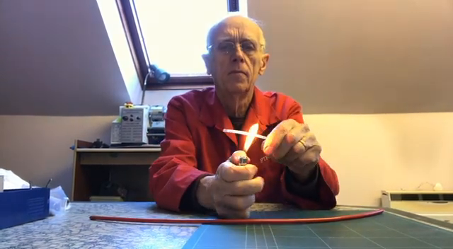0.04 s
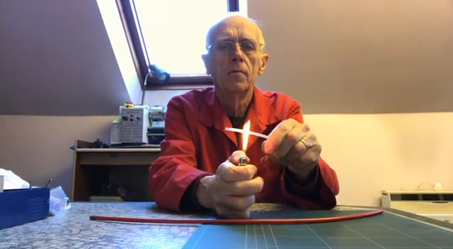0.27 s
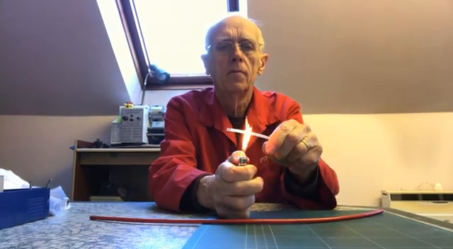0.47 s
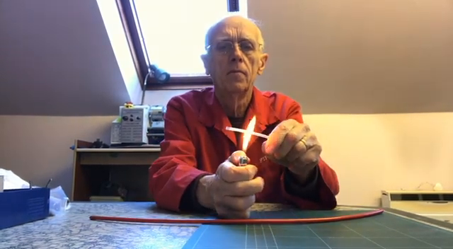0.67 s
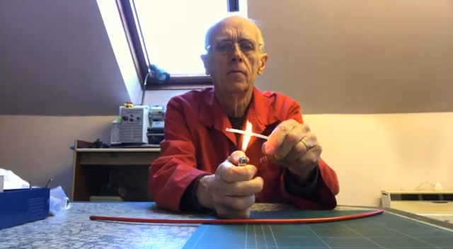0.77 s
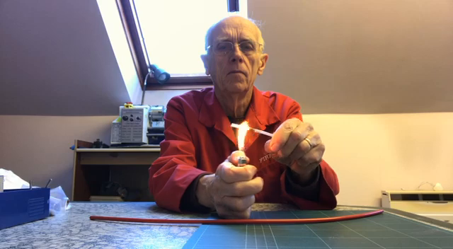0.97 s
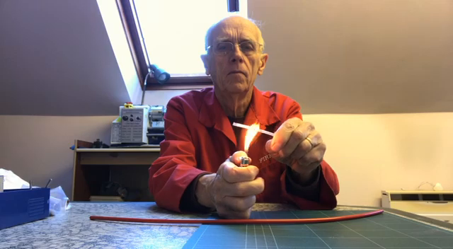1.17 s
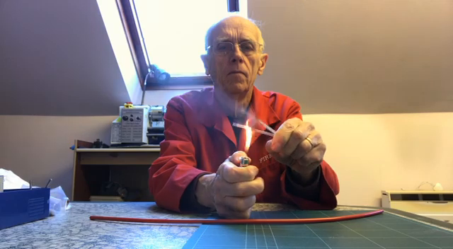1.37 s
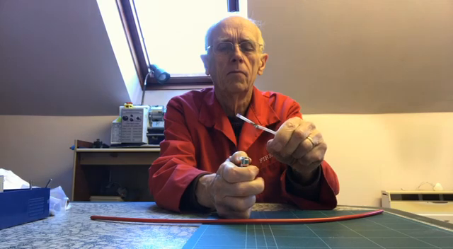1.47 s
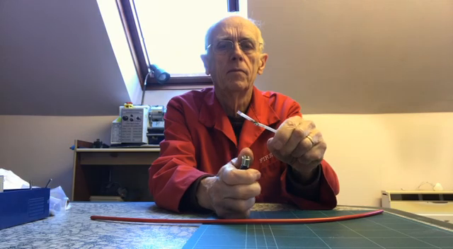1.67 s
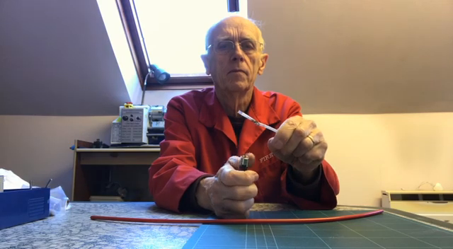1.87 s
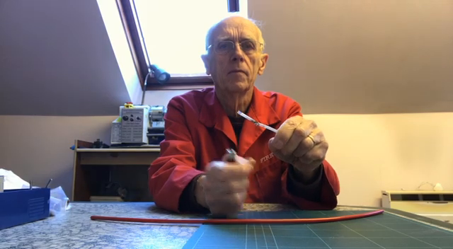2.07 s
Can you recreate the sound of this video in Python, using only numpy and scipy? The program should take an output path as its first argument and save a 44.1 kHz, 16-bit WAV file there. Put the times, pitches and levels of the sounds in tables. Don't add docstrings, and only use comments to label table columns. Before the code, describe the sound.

Quiet small room with a clock ticking about three times a second, low hum and faint hiss; then a sudden loud, bright pop of a plastic tube overloads the nearby microphone and dies quickly, leaving soft thumps and ticks.

```python
import sys
import numpy as np
from scipy import signal
from scipy.io import wavfile
from scipy.ndimage import map_coordinates

SR = 44100
rng = np.random.default_rng(int(sys.argv[2]) if len(sys.argv) > 2 else 0)


def output_pcm(signal):
    pcm = np.clip(np.atleast_2d(signal).T, -1, 1) * 32767
    wavfile.write(sys.argv[1], SR, np.round(pcm).astype(np.int16))


def gain_from_db(level_db):
    decades = np.asarray(level_db, float) / 20
    return 10 ** decades


N = 94109
T = np.arange(N) / SR

# (frequency [Hz], level [dB per Hz])
POP_COLOUR = [(40, -30.5), (200, -32), (600, -11.5), (2800, -9), (6500, -3.5), (8800, -10.5), (10500, -18),
              (15600, -20.5)]
# (frequency [Hz], t60 [s])
ROOM_DECAY = [(60, .1), (300, 0.25), (1000, .165), (3000, .155), (6500, 0.16), (12000, .15)]
# (time [s], share of the burst)
WALL_SLAPS = [
    (1.439, 3.0),
]
# (time [s], level [dB])
TEAR_RASP = [
    (1.3605, -69.5),
    (1.3625, -16.5),
    (1.369, -19),
    (1.375, -9),
    (1.380, -18),
    (1.383, -10.5),
    (1.386, -28.5),
]
# (frequency [Hz], width [Hz], level [dB])
TUBE_RESONANCES = [(330, 130, -3.5), (1100, 500, -3.5), (3500, 170, -3.5), (6200, 330, -11),
                   (7600, 1500, -9), (12040, 7000, -21.5)]
# (time [s], level [dB])
SPLINTERS = [
    (1.3615, -24),
    (1.363, -15),
    (1.3652, -21),
    (1.3688, -25),
]
# (time [s], peak level [dB], frequency [Hz], t60 [s])
WALL_SNAPS = [
    (1.372, -12, 3500, .03),
    (1.3745, -10, 1350, 0.076),
    (1.3745, -19, 330, 0.023),
    (1.3745, -20.5, 7600, .015),
    (1.376, -18.5, 6200, .05),
    (1.382, -6, 1050, 0.025),
    (1.3832, -7.5, 1100, 0.025),
    (1.3845, -2.5, 322.2, .08),
]
# (time [s], peak level [dB], frequency [Hz], t60 [s])
HAND_KNOCKS = [
    (1.533, -33, 65, .08),
    (1.535, -35, 170, .04),
    (1.63, -50, 575, .15),
    (1.632, -57, 1000, .08),
    (1.63, -55, 1500, .1),
    (1.668, -52, 4200, .01),
    (1.737, -42, 110, .05),
    (.64, -66, 2450, .6),
    (2.085, -56, 600, .03),
    (.6806, -43, 620, .02),
]
# (time [s], peak level [dB])
FLAME_CRACKLES = [
    (.312, -35),
    (.235, -50),
    (2.087, -48),
]
# (time [s], peak level [dB])
CLOCK_TICKS = [
    (.009, -35),
    (.344, -35),
    (.6779, -34),
    (.6806, -35),
    (.6823, -35),
    (1.011, -35),
    (1.345, -35),
    (1.678, -37.5),
    (2.011, -35),
]
# (frequency [Hz], level [dB], t60 [s])
CLOCK_CASE = [(1534, -1.5, .017), (900, -12, 0.016), (450, -8, 0.0064), (250, -9, 0.018), (2600, -16, .003),
              (4480, -16.5, .002), (7000, -14.5, .006)]
# (frequency [Hz], level [dB per Hz])
ROOM_FLOOR = [(12, -50), (20, -18.5), (74, 2), (153, -13.5), (770, -23), (1310, -28), (4990, -35),
              (6970, -37), (15600, -48.5)]
# (frequency [Hz], width [Hz], level [dB], share left once the flame is out)
WHINES = [(70.76, 38, -59.5, .8), (1334.3, 410, -68.5, 0.15), (6920, 790, -70, .5), (11660, 180, -80, .9),
          (13425, 250, -81, .9), (13400, 2500, -71.5, 1.3)]
# (time [s], gain [dB])
GAIN_CONTROL = [
    (0, 0.5),
    (1.385, 0),
    (1.39, -11),
    (1.68, -9),
    (1.82, -12),
    (1.95, -8.5),
    (2.13, 1),
]

POP_S, VENT_S = 1.3845, .036


def pop():
    rise_s, bright_rise_s = .0004, .002
    hz, noise = bands(POP_COLOUR)
    burst = 0
    for f, band in zip(hz, noise):
        envelope = venting(at_hz(ROOM_DECAY, f), rise_s + bright_rise_s * (f > 4500))
        burst = burst + band * envelope * gain_from_db(0.51 * drift(30))

    jet_boost, jet_end_s, jet_fade_s = .7, 1.427, .006
    jet = jet_boost * np.clip((jet_end_s - T) / jet_fade_s + 1, 0, 1)
    slaps = sum(share * dying(s, .012, 0.00071) for s, share in WALL_SLAPS)
    burst = burst * (1 + jet + slaps)

    late_db, late_t60_s, late_hz, late_end_s = -36, .65, 5500, 1.705
    late = peaked_noise(rng.standard_normal(N), late_hz, 5000) * dying(POP_S, late_t60_s, rise_s)
    late_fade = np.clip((late_end_s - T) / 0.029, 0, 1)
    return gain_from_db(5) * (burst + gain_from_db(late_db) * late * late_fade)


def capsule_ring(burst):
    ring_delay_s, capsule_hz, capsule_width_hz, boost = .007, 6160, 610, 1
    return boost * resonance(burst * (T > POP_S + ring_delay_s), capsule_hz, capsule_width_hz)


def tear():
    white = rng.standard_normal((2, N))
    rasp = sum(gain_from_db(db) * peaked_noise(white[0], hz, width) for hz, width, db in TUBE_RESONANCES)
    tearing = (T > TEAR_RASP[0][0]) & (T < TEAR_RASP[-1][0])
    rasp = tearing * gain_from_db(in_time(TEAR_RASP) - 4.5) * rms_one(rasp)
    rip_t60_s = .008
    splinters = 1.1 * white[1] * sum(gain_from_db(db) * dying(s, rip_t60_s, .0003) for s, db in SPLINTERS)
    return rasp + splinters - knocks(WALL_SNAPS)


def knocks(rows):
    return sum(ring(clicks([(s, db)]), hz, t60) for s, db, hz, t60 in rows)


def flame():
    return resonance(clicks(FLAME_CRACKLES) + 1e-18, 7000, 16000)


def clock():
    ticks = clicks(CLOCK_TICKS)
    return sum(np.sign(1200 - hz) * gain_from_db(db) * ring(ticks, hz, t60) for hz, db, t60 in CLOCK_CASE)


def room_tone():
    hz, noise = bands(ROOM_FLOOR)
    hiss = sum(band * gain_from_db(0.4 * drift(9)) for band in noise)
    whine = 0
    for f, width, db, left in WHINES:
        level = gain_from_db(db + .8 * drift(25)) * np.where(T < POP_S, 1, left)
        whine = whine + level * peaked_noise(rng.standard_normal(N), f, width)
    return gain_from_db(-50.5 - 3) * hiss + whine


def venting(t60, rise_s):
    t = np.maximum(T - POP_S, 0)
    return (1 - np.exp(-t / rise_s)) * gain_from_db(-60 * np.maximum(t - VENT_S, 0) / t60)


def dying(start_s, t60, rise_s):
    t = np.maximum(T - start_s, 0)
    return (1 - np.exp(-t / rise_s)) * gain_from_db(-60 * t / t60)


def clicks(rows):
    out = np.zeros(N)
    for s, db in rows:
        out[int(s * SR)] = gain_from_db(db)
    return out


def ring(impulses, hz, t60):
    r = gain_from_db(-60 / (t60 * SR))
    w = 2 * np.pi * hz / SR
    return signal.lfilter([0, np.sin(w)], [1, -2 * r * np.cos(w), r * r], impulses + 1e-18)


def resonance(x, hz, width_hz):
    r = np.exp(-np.pi * width_hz / SR)
    poles = [1, -2 * r * np.cos(2 * np.pi * hz / SR), r * r]
    return signal.lfilter([(1 - r * r) / 2, 0, (r * r - 1) / 2], poles, x)


def peaked_noise(white, hz, width_hz):
    return rms_one(resonance(resonance(white, hz, width_hz), hz, width_hz))


def bands(spectrum):
    edges = 20 * 2 ** (np.arange(30) / 3)
    centres = np.sqrt(edges[1:] * edges[:-1])
    white = rng.standard_normal((2, N))
    out = []
    for k, hz in enumerate(centres):
        sos = signal.butter(2, edges[k:k + 2], "band", fs=SR, output="sos")
        out.append(gain_from_db(at_hz(spectrum, hz)) * signal.sosfilt(sos, white[k % 2]))
    out = np.array(out)
    return centres, out / np.std(out.sum(0))


def drift(rate):
    knots = rng.standard_normal(200)
    return map_coordinates(knots, [T * rate * 2], order=3, mode="wrap")


def in_time(rows):
    return np.interp(T, *np.transpose(rows))


def at_hz(points, hz):
    table_hz, value = np.transpose(points)
    return np.interp(np.log(hz), np.log(table_hz), value)


def rms_one(x):
    return x / np.sqrt(np.mean(x ** 2) + 1e-20)


def scene():
    burst = pop()
    burst = burst + capsule_ring(burst)
    return (burst + tear() + knocks(HAND_KNOCKS) + flame() + clock() + room_tone())[None]


def band_limit(x):
    return signal.sosfilt(signal.butter(12, 15780, fs=SR, output="sos"), x)


def record(dry):
    ceiling, knee = .97, 5.0
    low_cut = signal.butter(2, 35, "high", fs=SR, output="sos")
    x = signal.sosfilt(low_cut, dry) * gain_from_db(in_time(GAIN_CONTROL)) / ceiling
    x = x + gain_from_db(-76) * rng.standard_normal(N)
    mix = ceiling * x / (1 + np.abs(x) ** knee) ** (1 / knee)
    return band_limit(mix)


dry = scene()
out = record(dry)
output_pcm(out)
```